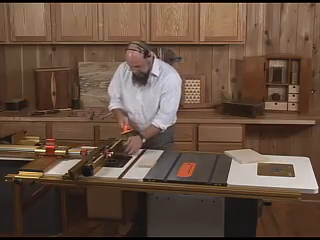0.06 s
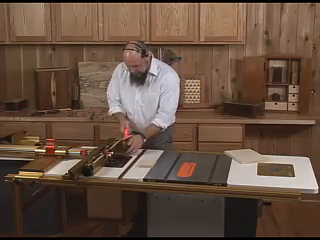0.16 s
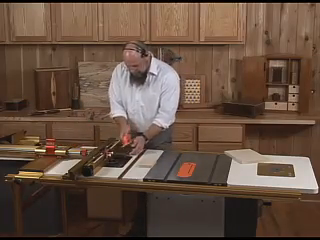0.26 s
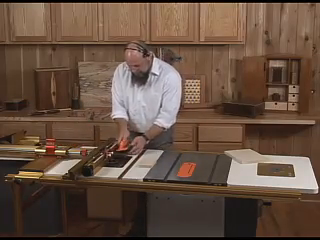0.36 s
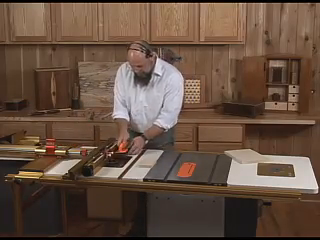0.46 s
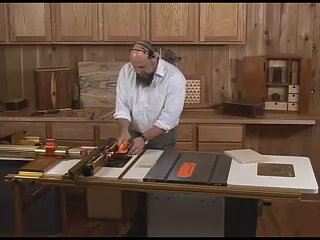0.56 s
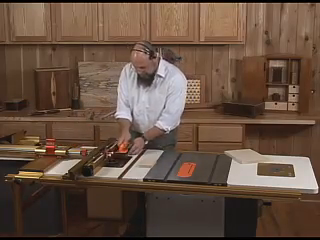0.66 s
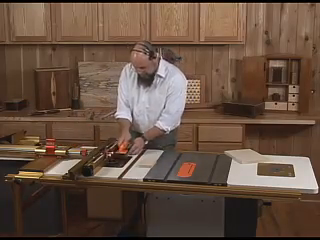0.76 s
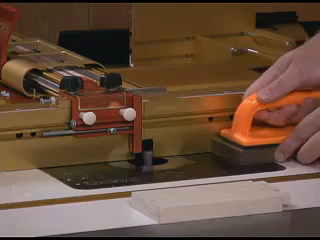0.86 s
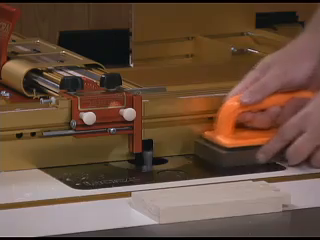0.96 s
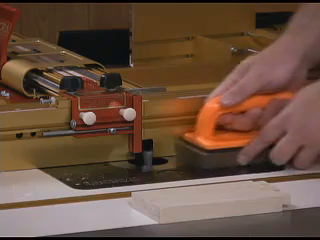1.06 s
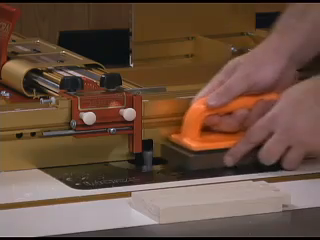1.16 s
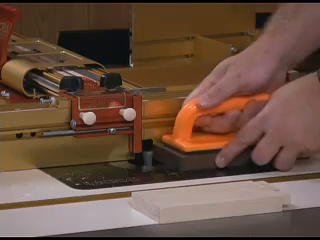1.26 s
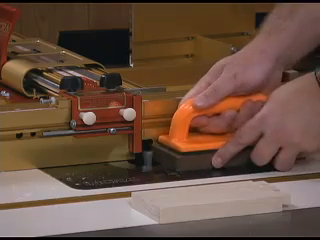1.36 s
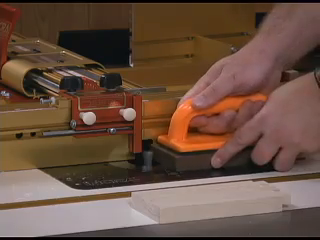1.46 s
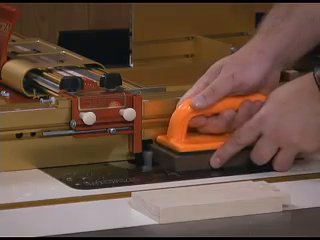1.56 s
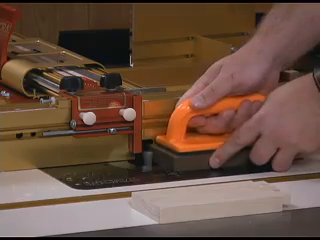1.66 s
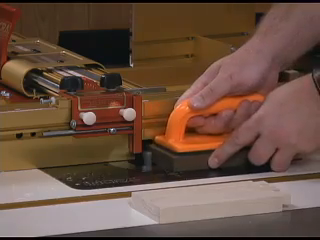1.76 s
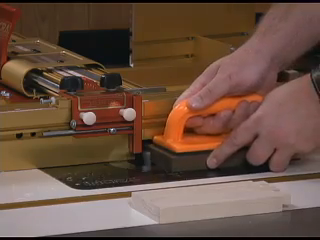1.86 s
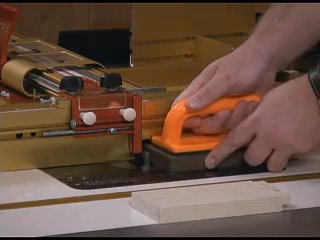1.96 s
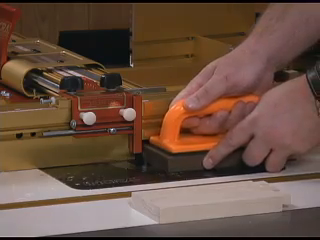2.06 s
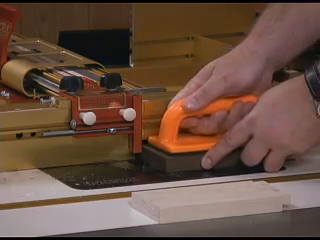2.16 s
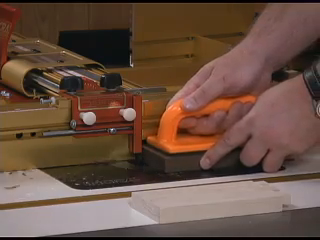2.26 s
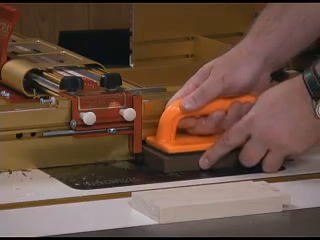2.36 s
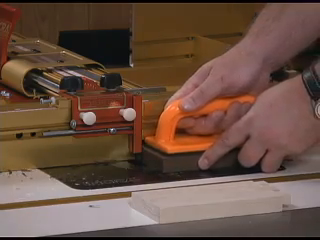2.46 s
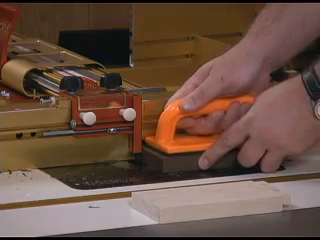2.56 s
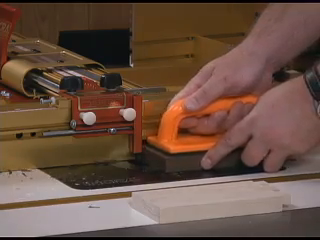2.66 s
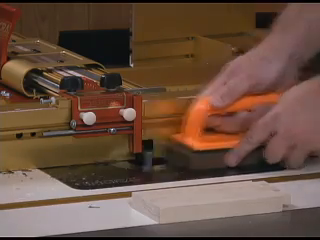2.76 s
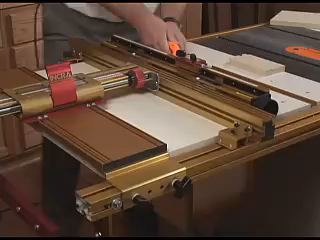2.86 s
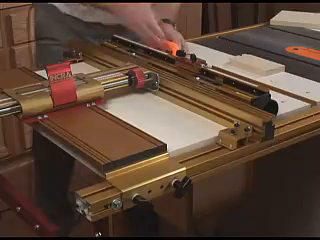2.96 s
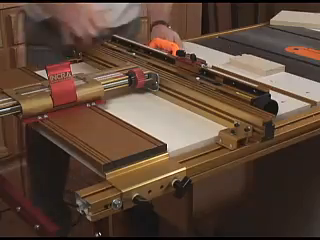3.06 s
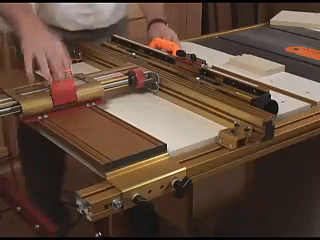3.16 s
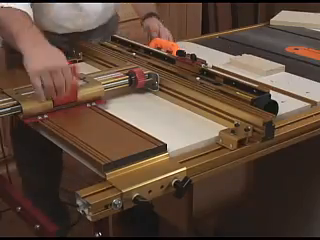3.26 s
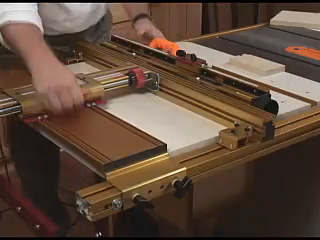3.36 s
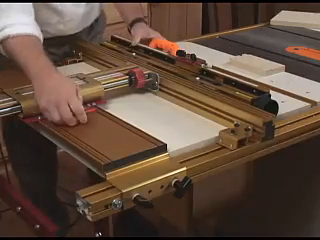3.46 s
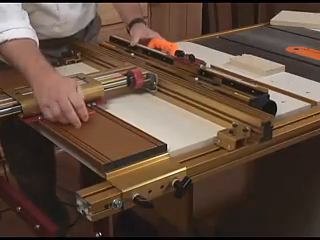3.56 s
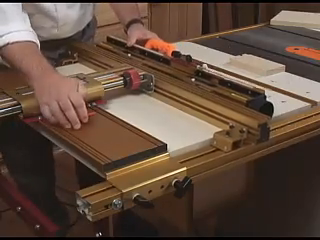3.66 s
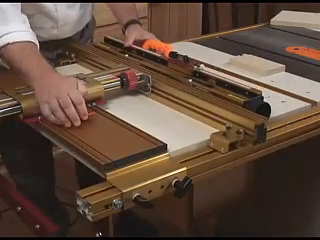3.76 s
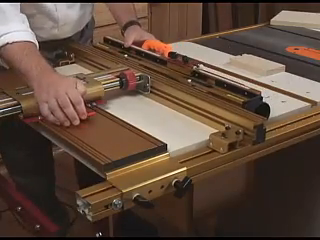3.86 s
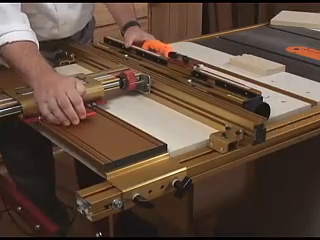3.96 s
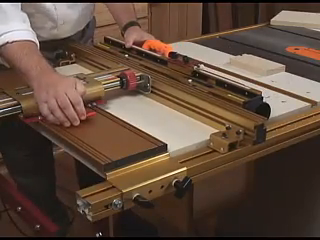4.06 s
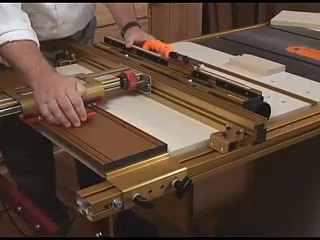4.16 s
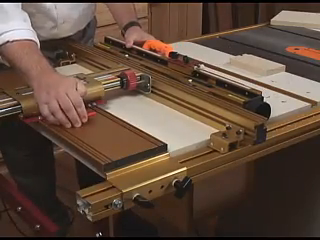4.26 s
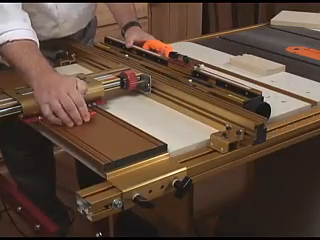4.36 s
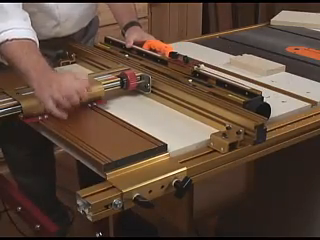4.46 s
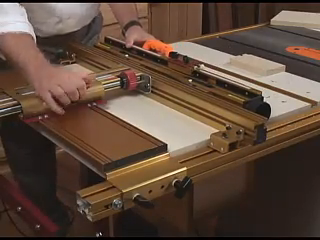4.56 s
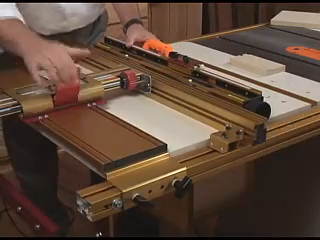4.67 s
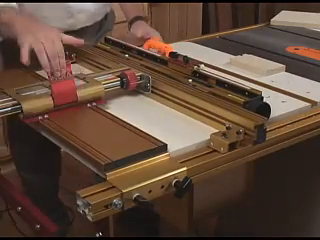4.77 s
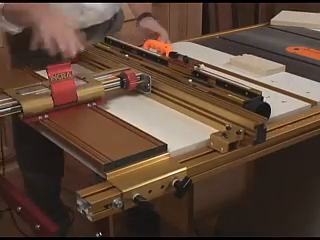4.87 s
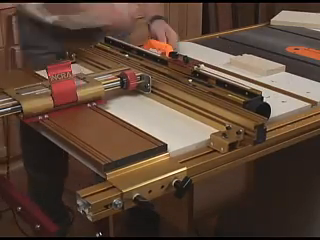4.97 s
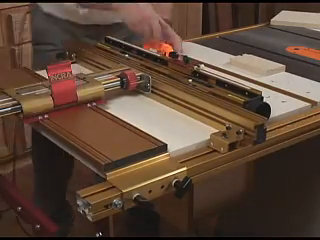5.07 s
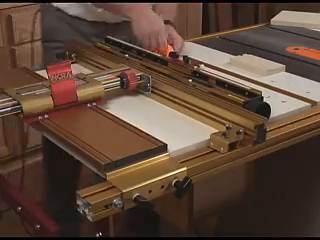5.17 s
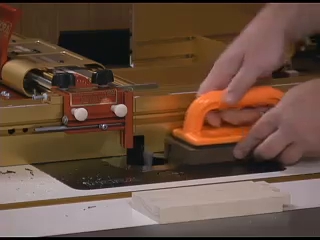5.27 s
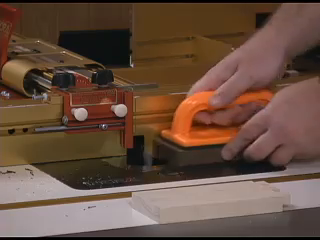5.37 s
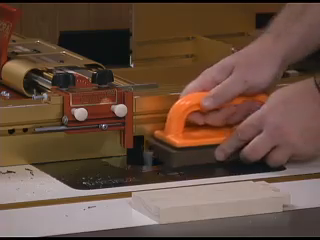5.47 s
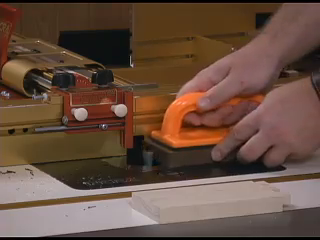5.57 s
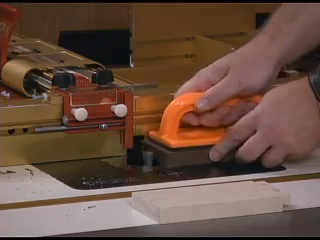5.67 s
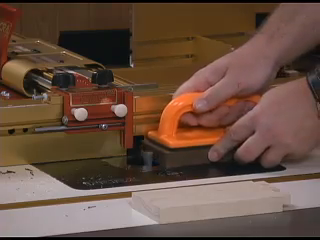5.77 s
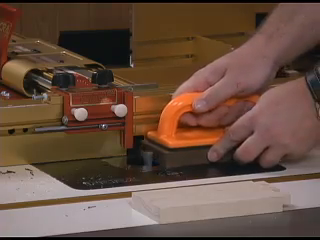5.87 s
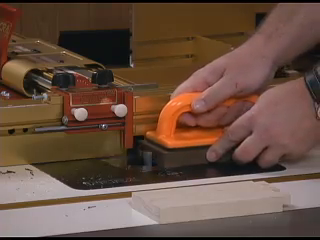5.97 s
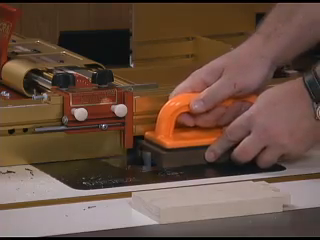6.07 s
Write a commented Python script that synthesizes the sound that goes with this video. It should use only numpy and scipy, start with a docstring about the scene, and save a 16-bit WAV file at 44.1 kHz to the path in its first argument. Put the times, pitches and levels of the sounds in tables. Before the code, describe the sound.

Close in a small wood shop, a router motor winds up, a hard clack ringing over it. Feeding a board turns the whine into a loud raspy buzz, sinking in pitch and growing ragged and rattly. Freed, the motor rises to a steady airy whine; hands bump dully and a lever clicks. A cleaner second bite starts at the end. Short room echo, mostly central.

```python
"""A sharp clack rings out early, as the whine of a table router climbs to full speed in a wood shop.
A board is pushed into the bit: the motor slows, the knives buzz, fibres tear and the board chatters.
The motor recovers amid soft bumps and a lighter knock as a lever on the fence is worked; a second pass begins.
One spindle speed drives sine tones, clicks and pulsing noise; shaped noise makes the cooling air,
fading sine waves make the knocks, and decaying noise gives the knocks and cutting their room echo."""
import sys
import numpy as np
from scipy import signal
from scipy.fft import rfft, irfft, next_fast_len
from scipy.io import wavfile
from scipy.ndimage import uniform_filter1d

SR = 44100
rng = np.random.default_rng(int(sys.argv[2]) if len(sys.argv) > 2 else 0)


def master_out(mix):
    """Clip the mix to full scale and print it as 16-bit PCM to the path in sys.argv[1]."""
    frames = np.transpose(np.atleast_2d(mix))
    ceiling = np.clip(frames, -1, 1)
    pcm = np.round(ceiling * 32767).astype(np.int16)
    wavfile.write(sys.argv[1], SR, pcm)


N = 269010
T = np.arange(N) / SR  # time in seconds
MAINS_RIPPLE_HZ = 120
FREE_HZ = 380  # turns per second of the warm motor without load

# overtones of the bite, each with two side tones one mains ripple away; levels against the knife strokes:
# speed_multiple, overtone_db, side_tone_below_db, side_tone_above_db
BITE_OVERTONES = [(3, -11.5, -28, -13), (4, -12.5, -12.5, -17), (5, -10, -14, -24), (6, -9, -15.5, -18.5),
                  (7, -8.5, -13, -11), (8, -8.5, -15, -15), (9, -10, -18.5, -15), (10, -15, -18, -25),
                  (11, -14.5, -12, -19), (12, -16, -19, -24), (13, -16, -22, -28), (14, -19, -22, -24),
                  (15, -26, -24, -26), (16, -27, -28, -25)]


def undb(db):
    """Turn decibels into a plain gain."""
    return 10 ** (np.asarray(db) / 20)


def curves(table):
    """Join the points of each column by straight lines in time; the first column is time."""
    seconds, *columns = np.transpose(table)
    return [np.interp(T, seconds, column) for column in columns]


def unit(x):
    """Scale to an average (rms) strength of 1."""
    return x / np.sqrt(np.mean(x ** 2))


def noise():
    """Make white noise, equally strong at every pitch."""
    return rng.standard_normal(N)


def walk(rate):
    """Drift by chance with rms 1: noise averaged twice over 1/rate seconds; a higher rate is quicker."""
    step = 8  # draw one value for every 8 samples
    coarse_times = T[::step]
    width = int(SR / step / rate)
    coarse = rng.standard_normal(len(coarse_times))
    for _ in range(2):
        coarse = uniform_filter1d(coarse, width, mode="wrap")
    return np.interp(T, coarse_times, unit(coarse))


def swell(middle_s, length_s):
    """Rise and fall in a smooth bell shape with peak 1; length_s is its standard deviation."""
    return np.exp(-.5 * ((T - middle_s) / length_s) ** 2)


def colour(x, points):
    """Shape the spectrum by (pitch_hz, relative_db) points, then scale to rms 1."""
    pitch_hz, relative_db = np.transpose(points)
    size = next_fast_len(N + 4096)
    f = np.maximum(np.arange(size // 2 + 1) * SR / size, 1)
    gain = undb(np.interp(np.log(f), np.log(pitch_hz), relative_db))
    return unit(irfft(rfft(x, size) * gain, size)[:N])


def resonance(x, hz, width_hz):
    """Let a narrow band ring, like a tuned metal part; gain 1 at its centre."""
    return signal.lfilter(*signal.iirpeak(hz, hz / width_hz, fs=SR), x)


def low_pass(x, order, top_hz):
    """Soften everything above top_hz."""
    return signal.sosfilt(signal.butter(order, top_hz, fs=SR, output="sos"), x)


def shop(x, wet_db, t60_s, dull_hz):
    """Add a dense, duller echo from the wooden walls, which fades by 60 dB in t60_s."""
    t = T[:SR // 2]
    decay = np.exp(-np.log(1000) * t / t60_s)
    tail = rng.standard_normal(len(t)) * decay * (t > .004)  # the echo starts after 4 ms
    tail = low_pass(tail, 2, dull_hz)
    tail = tail / np.sqrt(np.sum(tail ** 2))
    return x + undb(wet_db) * signal.fftconvolve(x, tail)[:N]


def fading(depth, rate):
    """A tone meets its own reflections from the room, so it swells and dips; mean power 1."""
    return unit(np.abs(1 + depth * (walk(rate) + 1j * walk(rate))))


def cut_levels():
    """Give the cutting tone, knife stroke and tearing levels in dB, taking the louder of the two passes."""
    # the two passes of the board, as levels before the final mix:
    # start_s, twice_a_turn_cutting_tone_db, clean_knife_strokes_db, tearing_fibres_db
    board_passes = [
        [(1.42, -64, -65, -76), (1.52, -51.5, -56, -66), (1.63, -40, -47, -51), (1.71, -38.5, -46.5, -51),
         (1.78, -43, -47.5, -51), (1.86, -35.5, -47, -49), (1.96, -38, -45.5, -47.5), (2.03, -42, -48, -38),
         (2.08, -45, -45, -37), (2.145, -40, -49, -38.5), (2.175, -41, -54, -46.5), (2.2, -43, -50, -35),
         (2.23, -45, -50, -45.5), (2.275, -58, -49, -41), (2.31, -43, -55, -47), (2.42, -57, -50.5, -48),
         (2.49, -47, -54, -47), (2.56, -46.5, -54, -44), (2.62, -49, -56.5, -55.5), (2.72, -57, -52.5, -58),
         (2.795, -39, -52, -64), (2.82, -47, -56.5, -69), (2.88, -52, -67, -68), (2.92, -70, -80, -78)],
        [(5.73, -62, -75, -90), (5.79, -35.5, -47, -55), (5.88, -33.3, -49, -54), (5.97, -36, -49.5, -50.5),
         (6.04, -36, -46.5, -45), (6.1, -33, -46, -48)],
    ]
    return np.max([curves(one_pass) for one_pass in board_passes], axis=0)


def load():
    """Tell how hard the board bears on the bit, 0-1, from the level of the knife strokes."""
    contact_db, full_load_db = -58, -55  # the motor begins to labour, is fully loaded
    stroke_db = cut_levels()[1]
    return np.clip((stroke_db - contact_db) / (full_load_db - contact_db), 0, 1)


def raggedness():
    """Tell how much of the cut tears rather than slices, 0-1."""
    _, stroke_db, tear_db = cut_levels()
    return np.clip((tear_db - stroke_db + 8) / 14, 0, 1)


def throb_depth(hz):
    """The slower the motor, the more current it draws and the deeper its torque ripples."""
    free_depth, depth_per_hz, most = 0.14, 0.016, 0.52  # in nepers (1 neper is 8.7 dB)
    lost_hz = np.maximum(FREE_HZ - hz, 0)
    return np.minimum(free_depth + depth_per_hz * lost_hz, most)


def chatter_level(hz):
    """Chatter builds when a heavy cut drags the speed into the range where the board bounces."""
    middle_hz, spread_hz = 327.9, 10.35
    in_range = np.exp(-.5 * ((hz - middle_hz) / spread_hz) ** 2)
    # it grows more steeply than the tearing: -34.5 dB where the tearing is at -36 dB
    return in_range * undb(-34.5 + 1.22 * (cut_levels()[2] + 36))


def background(rumble_db=-79, hiss_db=-70):
    """Faint low noise rumbles differently in each channel, with a thin noise hiss on the right."""
    # colour of the rumble: pitch_hz, relative_db
    rumble_colour = [(20, -3), (45, 7), (60, 15.5), (85, 1), (130, -3), (200, 11), (400, -29.5)]
    hiss_colour = [(3000, -72.0), (6500, -3.5), (10500, 7.5), (13000, 5.5), (14200, -5), (15500, -14)]
    rumble = undb(rumble_db) * np.array([colour(noise(), rumble_colour) for _ in range(2)])
    hiss = undb(hiss_db) * colour(noise(), hiss_colour)
    return rumble + np.outer([0, 1], hiss)


def bumps():
    """Hands moving about the table make dull thuds: short swells of low noise."""
    # soft handling bumps: middle_s, level_db, length_s
    soft_bumps = [(2.68, -79, 0.084), (2.958, -69.5, 0.079), (3.419, -57, 0.015), (4.626, -62, 0.026),
                  (4.934, -65, 0.036)]
    level = sum(undb(db) * swell(s, length_s) for s, db, length_s in soft_bumps)
    thud_colour = [(20, 4), (70, 0.0), (140, 12.5), (210, -5.0), (400, -45.5)]
    return level * colour(noise(), thud_colour)


def knocks(crack_db=-27.0, crack_s=0.0026, low_lag_s=0.00155, body_hz=520):
    """Hard contacts on table and fence give a short crack and fading tones, the low ones a little later."""
    # ringing tones of one clack: pitch_hz, level_db, t60_s (time to fade by 60 dB)
    clack_modes = [(770, -33, 0.011), (884, -24, 0.018), (1194, -30, 0.012), (1430, -38.5, .011),
                   (1720, -35, 0.016), (2330, -23.5, 0.0083), (2630, -27, 0.012), (2740, -32, 0.012),
                   (3020, -28, 0.016), (3420, -37, .01), (3770, -30, 0.021), (4150, -24, 0.0088),
                   (5300, -33.5, 0.0053), (8700, -31.5, 0.01)]
    # hard knocks: start_s, level_db against the strongest
    hard_knocks = [(0.1304, 0), (.133, -14), (.139, -21), (0.143, -19), (4.712, -12.5)]
    t = T[:SR // 8]
    lowest_hz = clack_modes[0][0]
    ring = 0
    for k, (hz, db, t60_s) in enumerate(clack_modes):
        age = np.maximum(t - low_lag_s * lowest_hz / hz, 0)
        decay = np.exp(-np.log(1000) * age / t60_s)
        ring = ring + (-1) ** k * undb(db) * np.sin(2 * np.pi * hz * age) * decay
    crack = signal.lfilter(*signal.butter(1, 3500, fs=SR), rng.standard_normal(len(t)))
    crack = crack * np.exp(-t / crack_s)
    # small parts send out almost no bass
    hit = signal.lfilter(*signal.butter(2, body_hz, "high", fs=SR), ring + undb(crack_db) * crack)
    blows = np.zeros(N)
    for s, db in hard_knocks:
        blows[int(s * SR)] += undb(db)
    return signal.fftconvolve(blows, hit)[:N]


def fan(turns, speed_hz, tip_order=15.1, tip_width_hz=650):
    """Cooling air rushes through the housing and rings it, whistles off the fan blades and hisses from vents."""
    # colours of the rush and the bright hiss: pitch_hz, relative_db
    rush_colour = [(100, -24), (220, -8.5), (330, -5.5), (600, 0.5), (900, 0), (1150, 1), (1480, 2),
                   (2100, -0.5), (3350, 4), (4200, 1), (5000, -5.5), (6500, -15.5), (11000, -21.5),
                   (14000, -59)]
    hiss_colour = [(1000, -34), (4000, -20.5), (5500, -8), (7000, -7), (8000, -5.5), (8700, -2),
                   (11700, -3), (12700, -17.5), (15000, -40)]
    # resonances of the motor housing: pitch_hz, width_hz, level_db against the rush
    housing_modes = [(3313, 144, -2), (3740, 300, -11.5), (1447, 76, -4.5), (1790, 60, -4), (3990, 42, -3),
                     (419, 7, -9), (495.1, 21, -6.5), (949, 28, -2)]
    # the rush swells and eases a little: start_s, change_db
    rush_swell = [(0, 4.5), (.3, 1), (.7, 1), (.9, 1.4), (1.3, 0.6), (1.5, -.5), (2.9, 0.5), (3.5, 0.5),
                  (4.3, -0.4), (5, .5), (5.3, -0.5), (5.7, -1)]
    # whistling rush from the blade tips, then the bright hiss: start_s, level_db
    tip_level = [(0, -86), (.7, -81), (1.1, -67), (1.5, -67), (2.05, -51), (2.3, -62), (2.68, -74),
                 (2.78, -57), (2.87, -60), (3.8, -55.5), (4.7, -55), (5, -58.5), (5.3, -61), (6.1, -62.5)]
    hiss_level = [(0, -72.5), (.75, -68), (1.25, -70), (1.45, -80), (2.88, -80), (2.98, -60), (3.55, -61),
                  (3.8, -56.5), (4.78, -57), (5.08, -66), (5.22, -77), (6.1, -78)]

    # the rush grows with speed; the board muffles it by covering the opening round the bit
    rush_db = -45 + 0.0623 * (speed_hz - FREE_HZ) - 2.5 * load() + curves(rush_swell)[0]
    air = colour(noise(), rush_colour)
    ringing = sum(undb(db + 2 * walk(35)) * resonance(air, hz, width_hz)
                  for hz, width_hz, db in housing_modes)
    rush = unit(air + ringing) * undb(rush_db + 0.69 * walk(25))
    # eddies shed by the blade tips make a band whose pitch follows the speed
    eddies = low_pass(noise(), 4, tip_width_hz)
    tips = unit(eddies * np.cos(2 * np.pi * tip_order * turns)) * undb(curves(tip_level)[0])
    hiss = colour(noise(), hiss_colour) * undb(curves(hiss_level)[0] + .4 * walk(20))
    return rush + tips + hiss


def brushes(turns, hz, whine_db=-70):
    """While the cut drags the motor down, the commutator sings thin tones at the top of the treble."""
    strain = load() * np.clip((355 - hz) / 20, 0, 1)  # silent above 355 turns per second, full below 335
    # speed multiple: relative dB
    bar_tones = {31: -6, 33: -8, 37: -15, 42: 1, 44: -3, 46: -9}
    whine = 0
    for k, db in bar_tones.items():
        level = undb(whine_db + db + 2 * walk(40))
        whine = whine + level * np.sin(2 * np.pi * k * turns + 1.2 * walk(200))
    return strain * whine


def side_tones(turns, fade=0.26, slip=0.57):
    """The mains ripple beats with the three lowest shaft tones and roughens the whine."""
    # side tones one mains ripple above or below a shaft tone:
    # start_s, above_first_db, above_second_db, below_third_db
    side_levels = [(0, -69, -66, -68), (.55, -77.5, -70, -64), (1.05, -72, -61, -59),
                   (1.4, -76, -56.5, -61), (1.58, -71, -61, -57), (1.68, -76, -47, -60),
                   (1.8, -72, -60, -62), (1.95, -64, -62, -72), (2.06, -59, -46, -75),
                   (2.14, -58, -46, -75), (2.28, -59, -50, -75), (2.37, -60.5, -59, -75),
                   (2.54, -52, -46, -72), (2.62, -66, -58, -72), (3.1, -80, -80, -62), (3.7, -80, -78, -63),
                   (5.95, -77, -66, -67), (6.02, -74, -52.5, -65), (6.1, -74, -57, -68)]
    ripple = MAINS_RIPPLE_HZ * T
    cycles = [turns + ripple, 2 * turns + ripple, 3 * turns - ripple]
    out = 0
    for cycle, db in zip(cycles, curves(side_levels)):
        tone = np.sin(2 * np.pi * cycle + slip * walk(40))
        out = out + undb(db) * fading(fade, 22) * tone
    return np.sqrt(2) * out


def shaft(turns, hz, flutter_share=0.085, low_fade=0.12, weak_fade=0.62, cut_fade=0.07, bite_fade=0.37,
          blur=0.035):
    """Imbalance and two knives give tones at multiples of the speed; the upper ones flutter with the mains."""
    # once-a-turn hum, then the twice- and three-times-a-turn tones without load: start_s, level_db
    hum_level = [(0, -59), (.25, -53), (.38, -47.5), (.53, -44), (.66, -47.5), (.98, -42.5), (1.15, -47),
                 (1.62, -48.5), (1.74, -52.5), (1.83, -63), (1.875, -47), (2.01, -37.5), (2.11, -41.5),
                 (2.2, -41.5), (2.33, -56.5), (2.44, -56), (2.53, -46.5), (2.7, -50), (3.03, -44),
                 (3.3, -48), (4.65, -45), (5.13, -56), (5.62, -45), (5.84, -48), (5.93, -56.5),
                 (6.02, -44.5), (6.1, -48)]
    second_level = [(0, -63), (.27, -67), (.355, -53), (.43, -61), (.52, -47.5), (.63, -63), (.77, -67),
                    (.86, -46), (.93, -46.5), (1.03, -55), (1.1, -50.5), (1.25, -53.5), (1.38, -68),
                    (2.95, -48), (3.35, -52), (3.7, -48.5), (3.88, -64.5), (3.95, -55), (4.03, -53),
                    (4.07, -63), (4.35, -52), (4.58, -59.5), (4.75, -49), (4.92, -66), (5.08, -51),
                    (5.45, -54), (6.1, -50)]
    third_level = [(0, -72), (1.5, -60), (3.1, -61.5), (3.35, -50), (3.72, -57), (3.91, -53.5),
                   (4.2, -63.5), (4.6, -46), (4.85, -60), (5.06, -51.5), (5.3, -60)]
    # weaker tones: speed_multiple, level_db at free speed
    weak_tones = [(4, -59.5), (5, -63.5), (7, -63.5), (8, -62), (10, -63)]
    # single overtones sing out, most of all as the knives graze the board going in and out:
    # middle_s, length_s, speed_multiple, level_db
    sings = [(1.9, 0.046, 7, -60), (1.92, 0.054, 8, -56), (1.87, .04, 9, -57), (1.544, .04, 13, -59),
             (1.784, 0.038, 5, -46.5), (1.6, .022, 24, -63), (1.935, 0.061, 4, -47), (2.37, 0.1, 4, -48),
             (2.418, 0.07, 3, -49), (3, 0.022, 6, -58), (2.3, .025, 7, -58), (2.78, 0.02, 12, -50.5),
             (3.2, 0.0253, 14, -54), (2.5, 0.02, 15, -58), (3.955, 0.039, 4, -54), (4.202, 0.097, 4, -56.5),
             (4.768, 0.044, 4, -51), (4.934, 0.018, 4, -54), (5.795, 0.029, 6, -45.5),
             (5.805, .032, 4, -44), (5.815, 0.049, 7, -48.5), (8.8, 0.051, 8, -53), (5.885, .018, 11, -53),
             (5.865, 0.057, 3, -43), (6.0, .04, 3, -46)]
    # brief dips of all shaft tones, mostly while the speed glides: middle_s, depth_db
    brief_dips = [(.452, -10), (1.17, -4), (1.908, -9), (2.15, -8), (2.31, -4), (2.44, -7.5), (2.609, -30),
                  (2.71, -7), (2.88, -9.5), (3.23, -2)]

    angle = 2 * np.pi * turns
    hum = undb(curves(hum_level)[0] + .5 * walk(40)) * fading(low_fade, 10.0)
    hum = hum * np.sin(angle + 0.1 * walk(35))

    tone_db, stroke_db, _ = cut_levels()
    # each part is (multiple, level)
    parts = [(2, undb(curves(second_level)[0]) * fading(low_fade, 9.2)),
             (2, undb(tone_db) * fading(cut_fade, 27)),
             (3, undb(curves(third_level)[0]) * fading(low_fade, 8.1)),
             (3, undb(tone_db - 20.5))]
    for k, db in weak_tones:
        speed_db = 0.1 * (hz - FREE_HZ)  # they grow with speed
        parts.append((k, undb(db + speed_db) * fading(weak_fade, 9.2)))
    for k, db, _, _ in BITE_OVERTONES:
        parts.append((k, undb(stroke_db + db) * np.abs(1 + bite_fade * walk(20))))
    for s, length_s, k, db in sings:
        parts.append((k, undb(db) * swell(s, length_s)))

    # parts on the same multiple add in power
    power = {}
    for k, level in parts:
        power[k] = power.get(k, 0) + level ** 2
    snag = 0.097 * raggedness() * walk(123)  # tearing fibres jerk the bit, in radians
    upper = 0
    for k, p in power.items():
        phase = k * (angle + snag + blur * walk(30)) + rng.uniform(0, 2 * np.pi)
        upper = upper + np.sqrt(p) * np.sin(phase)
    flutter = 1 + flutter_share * throb_depth(hz) * np.cos(2 * np.pi * MAINS_RIPPLE_HZ * T)
    dip_db = sum(db * swell(s, 0.012) for s, db in brief_dips)
    return np.sqrt(2) * (hum + flutter * upper) * undb(dip_db)


def snarl(turns, fade=0.4, slip=.9):
    """In the wood the throbbing torque flanks every overtone with side tones, which smear as fibres tear."""
    out, smear = 0, slip * raggedness()
    for k, _, below_db, above_db in BITE_OVERTONES:
        jerk = smear * walk(110)
        for side, db in ((-1, below_db), (1, above_db)):
            cycles = k * turns + side * MAINS_RIPPLE_HZ * T + rng.random()
            out = out + undb(db) * (1 + fade * walk(22)) * np.sin(2 * np.pi * cycles + jerk)
    return np.sqrt(2) * undb(cut_levels()[1]) * out


def chatter(turns, hz, unsteady_db=2.0, slip=0.32):
    """The board bounces unsteadily every second turn, so half multiples of the speed ring, most near 800 Hz."""
    # speed multiple: relative dB
    half_orders = {1.5: -46, 2.5: 1.0, 3.5: -15.0, 4.5: -33}
    tone = 0
    for k, db in half_orders.items():
        level = undb(db + unsteady_db * walk(130))
        tone = tone + level * np.sin(2 * np.pi * k * turns + slip * walk(68))
    return np.sqrt(2) * chatter_level(hz) * tone


def cutter(turns, hz, second_knife=0.097, scatter_db=0.5, chip_length=0.51, wander_s=1e-5, bounce_db=-44,
           click_db=-4, rattle=0.32):
    """Each knife clicks off a chip and tears fibres; one stands prouder, and mains torque makes the bite throb."""
    # colours of the clean strokes and the tearing: pitch_hz, relative_db
    knife_colour = [(20, -64), (150, -26), (500, -22), (850, -5), (1100, -2), (1650, -1), (1950, -1.5),
                    (2500, -2), (3300, -4), (4200, -1), (5500, -8.5), (7000, -7.5), (8600, -7),
                    (11500, -16.5), (15500, -26)]
    tear_colour = [(100, -34), (210, -18), (300, -8), (450, -1.5), (600, -4.5), (830, 2.5), (1100, -0.5),
                   (1400, -3.5), (1800, -0.5), (2600, -1.5), (3400, -3), (4200, -9.5), (5500, -15),
                   (7000, -18.5), (11000, -21), (13000, -32), (15500, -31)]
    _, stroke_db, tear_db = cut_levels()
    index = np.arange(1, int(2 * turns[-1]))  # two strokes a turn
    when = np.interp(index / 2, turns, T)
    strength_chance, timing_chance = rng.standard_normal((2, len(index)))

    depth = np.interp(when, T, throb_depth(hz))
    throb = np.exp(depth * np.cos(2 * np.pi * MAINS_RIPPLE_HZ * when))
    throb = throb / np.sqrt(np.i0(2 * depth))  # mean power 1
    # a chattering board takes a deep bite on one turn and a light one on the next
    bouncing = np.minimum(chatter_level(hz) / undb(bounce_db), 1)
    bounce = 0.1 * np.interp(when, T, bouncing)
    alternate = (1 + bounce * (-1) ** (index // 2)) / np.hypot(1, bounce)
    knife = np.where(index % 2, second_knife, 1)
    bite = knife * throb * alternate * undb(scatter_db * strength_chance)

    # every stroke is a click placed between samples, some microseconds early or late
    place = (when + wander_s * timing_chance) * SR
    taps = place.astype(int)[:, None] + np.arange(-7, 9)
    pulses = bite[:, None] * np.sinc(taps - place[:, None])
    clicks = np.bincount(taps.ravel(), pulses.ravel(), N)[:N]

    # fibres tear just after each stroke, in uneven splinters; chip_length is a share of the stroke
    since_stroke = 2 * turns % 1
    splinters = noise() * np.exp(-since_stroke / (2 * chip_length))
    splinters = splinters * np.interp(T, when, bite) * undb(1.7 * walk(170))
    # the bouncing board breaks the scrape into three pulses every two turns
    splinters = splinters * (1 + rattle * np.sqrt(bouncing) * np.cos(3 * np.pi * turns))
    strokes = colour(clicks, knife_colour) * undb(stroke_db + click_db)
    return strokes + colour(splinters, tear_colour) * undb(tear_db)


def scene():
    """One spindle speed drives fan, tones, strokes, chatter and brushes; all but the background is central."""
    # spindle speed: start_s, turns_per_second_hz
    spindle_speed = [(0, 266), (.1, 285.7), (.2, 307.3), (.3, 321.2), (.42, 331.2), (.65, 347.2),
                     (.95, 356.3), (1.3, 361.5), (1.52, 362), (1.7, 357), (1.9, 344), (2.1, 327),
                     (2.2, 318.3), (2.36, 317.3), (2.56, 320.7), (2.7, 331.6), (2.78, 342.3), (2.85, 349.2),
                     (3, 357), (3.3, 366.4), (3.8, 374.5), (4.6, 380), (5, 379.1), (5.72, 380.4),
                     (5.85, 376.3), (5.95, 372), (6.1, 361.8)]
    hz = uniform_filter1d(curves(spindle_speed)[0], SR // 25, mode="nearest")
    turns = np.cumsum(hz * (1 + 0.00028 * walk(28))) / SR
    # under load the mains ripple rocks the spindle back and forth, which roughens the high overtones
    rocking = turns + 0.0045 * load() * np.sin(2 * np.pi * MAINS_RIPPLE_HZ * T)

    handling = bumps() + shop(knocks(), wet_db=-10.0, t60_s=0.28, dull_hz=6130)
    motor = fan(turns, hz) + brushes(turns, hz) + side_tones(turns) + shaft(rocking, hz)
    cut = shop(cutter(rocking, hz), wet_db=1, t60_s=0.18, dull_hz=8600) * undb(-6.0)
    wood = snarl(turns) + chatter(turns, hz) + cut
    return background() + handling + motor + wood


def record(dry, left_top_hz=13000, top_hz=15400):
    """Make the left channel a little duller, then cut the top of both channels sharply."""
    dull = signal.butter(7, left_top_hz, fs=SR, output="sos")
    left = signal.sosfiltfilt(dull, dry[0])
    top_cut = signal.ellip(10, .2, 80, top_hz, fs=SR, output="sos")
    return signal.sosfilt(top_cut, np.array([left, dry[1]]))


dry = scene()
out = record(dry)
master_out(out)
```